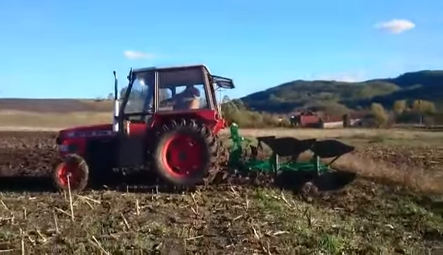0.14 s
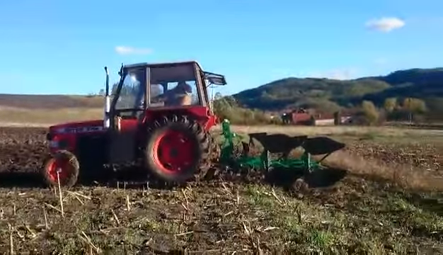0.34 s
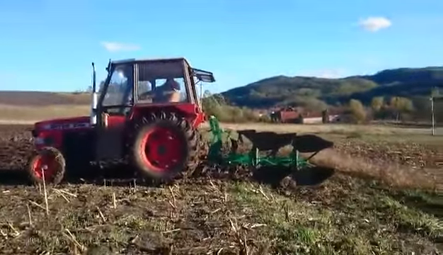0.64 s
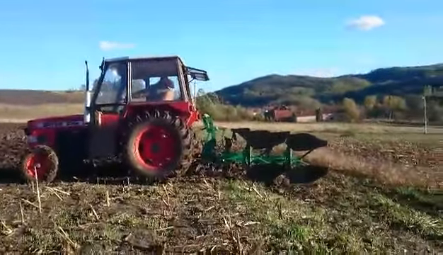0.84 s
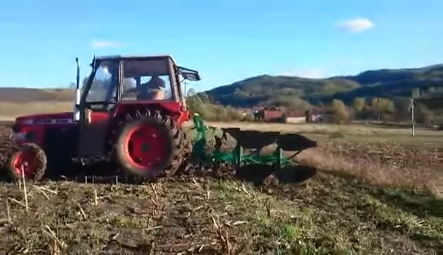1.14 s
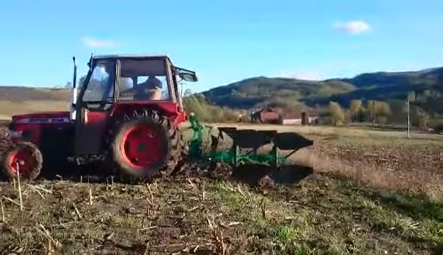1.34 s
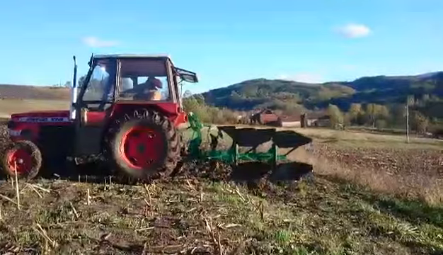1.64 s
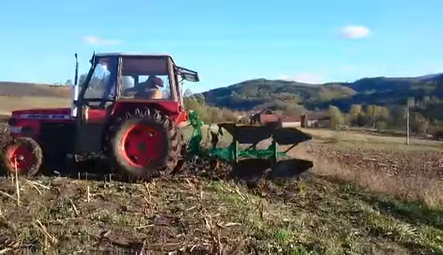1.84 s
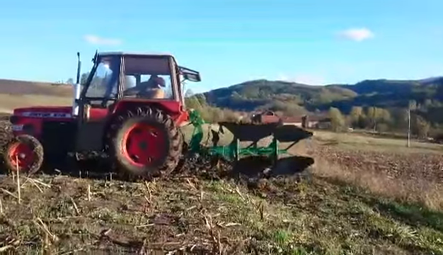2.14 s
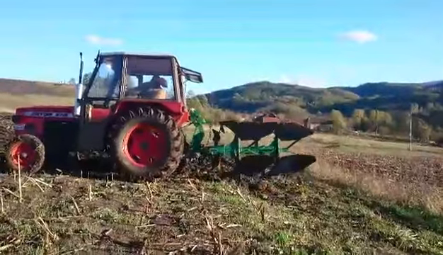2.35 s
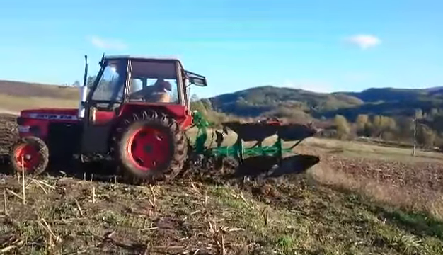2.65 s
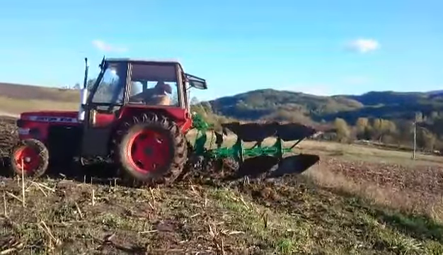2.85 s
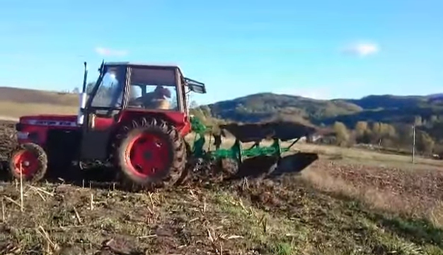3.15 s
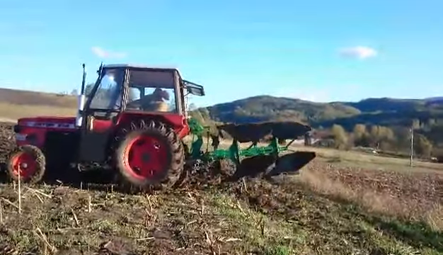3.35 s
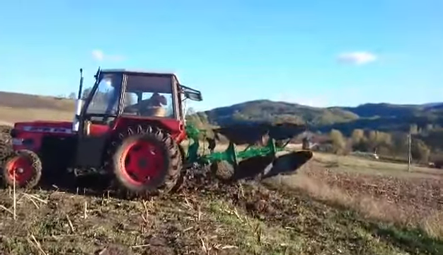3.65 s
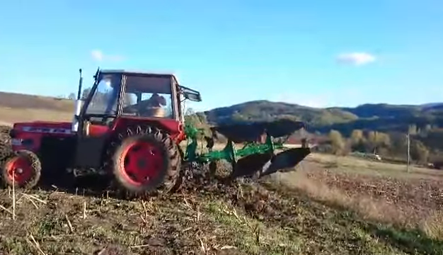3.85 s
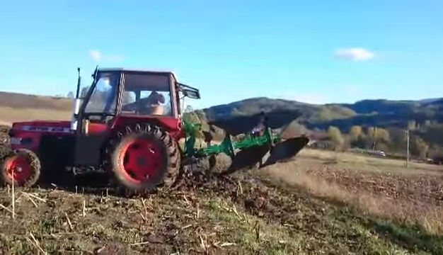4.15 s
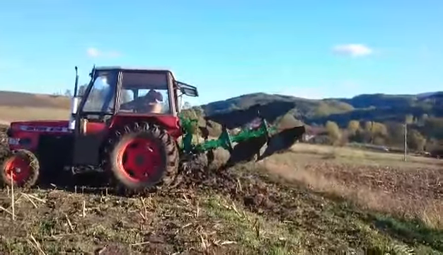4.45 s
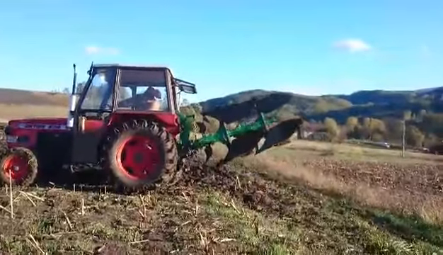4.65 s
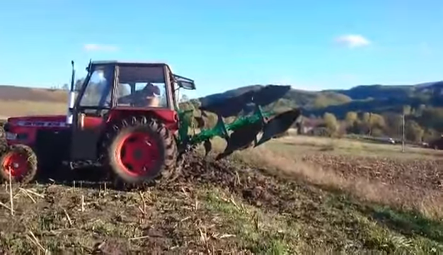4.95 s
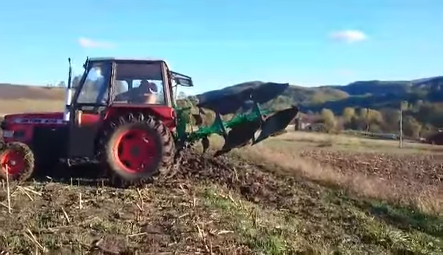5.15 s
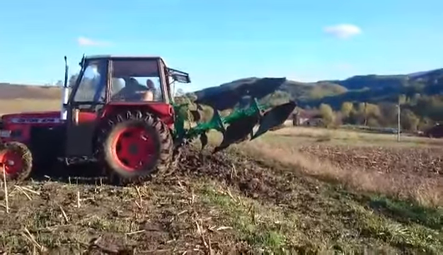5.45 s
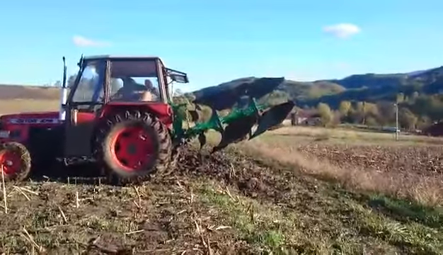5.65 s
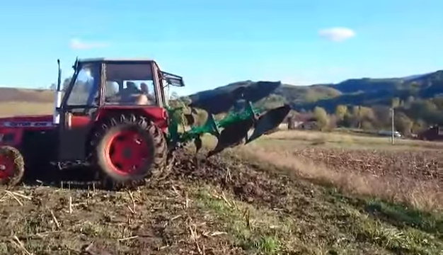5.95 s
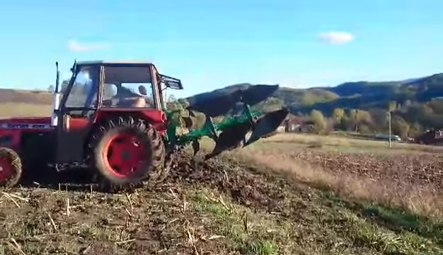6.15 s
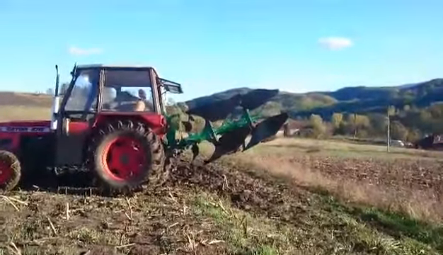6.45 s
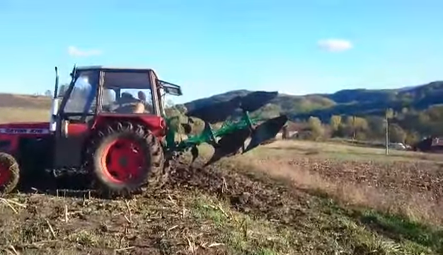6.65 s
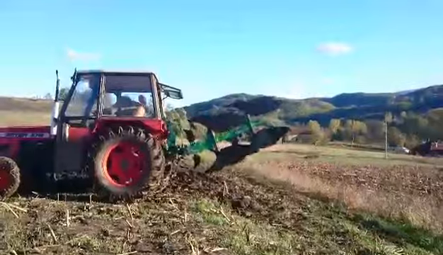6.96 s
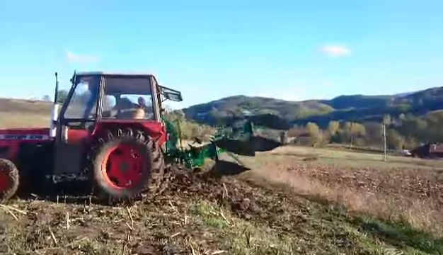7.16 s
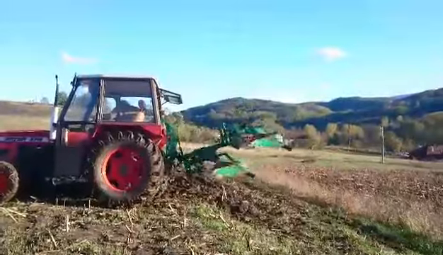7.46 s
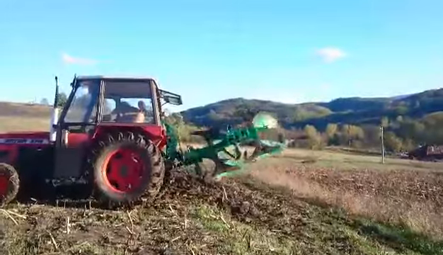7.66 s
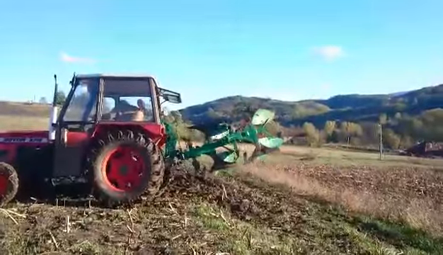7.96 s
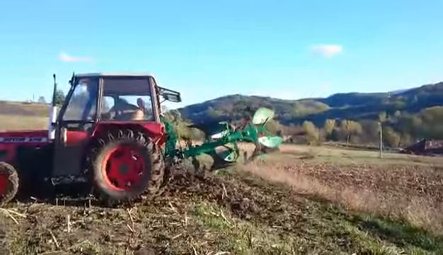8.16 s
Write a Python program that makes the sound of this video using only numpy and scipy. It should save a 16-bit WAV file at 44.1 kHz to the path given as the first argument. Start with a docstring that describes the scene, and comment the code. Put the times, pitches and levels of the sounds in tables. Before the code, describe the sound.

Steady rapid diesel knocking with a dull exhaust rumble, increasingly violent wind thumps on the microphone, and brief steel scrapes and clinks near the end.

```python
"""A diesel tractor clatters at about 38 firings a second over a dull exhaust rumble and a faint whistle.
Knocks and injector ticks are noise bursts, coloured like the block; the rumble is low noise, the whistle two tones.
Wind buffets the two ports of a small microphone, harder and harder: noise whose eddies shrink as it blows.
At the end of the furrow the plough is lifted and turned over: it clanks as scraping noise and ringing tones."""
import sys
import numpy as np
from scipy import signal
from scipy.fft import rfft, irfft
from scipy.io import wavfile
from scipy.ndimage import uniform_filter1d

SR = 44100
rng = np.random.default_rng(int(sys.argv[2]) if len(sys.argv) > 2 else 0)


def materialize(psi):
    """Save the field psi as 16-bit PCM at rate SR to the path in sys.argv[1].

    A 1-D psi becomes a single channel; in a 2-D psi each row is a channel.
    """
    bounded = np.clip(np.atleast_2d(psi).T, -1, 1)
    quanta = np.round(bounded * 32767).astype(np.int16)
    wavfile.write(sys.argv[1], SR, quanta)


N = 366471
TIME = np.arange(N) / SR
BINS = np.fft.rfftfreq(N, 1 / SR)  # Hz

# engine speed: time_s, firings_per_s
ENGINE_SPEED = [(0.0, 38.67), (0.7, 38.5), (1.5, 37.83), (2.3, 37.84), (3.1, 37.65), (4.2, 37.47),
                (4.7, 37.14), (5.1, 37.17), (5.7, 38.84), (6.5, 39.09), (7.1, 38.73), (7.6, 38.44),
                (8.31, 38.08)]


def count_firings():
    """The running count of firings: the engine speed summed over time."""
    first_firing = 0.45  # the count at the start
    return first_firing + np.cumsum(curves(ENGINE_SPEED)[0]) / SR


# the four cylinders in firing order, relative strengths: knock_db, ring_db, injector_tick_db
CYLINDERS = [(-3.5, 17, 11.5), (-5, 20.5, 11), (-3.5, 20.5, 13), (-3, 16, 15.5)]


def blows(firings, offset, cylinder_db, decay_s, scatter_db):
    """Power envelope of one decaying blow a firing, each cylinder with its own strength; mean 1."""
    number = np.arange(1, int(firings[-1]))
    late, size = rng.standard_normal((len(number), 2)).T
    jitter_s = 0.0013
    at_s = np.interp(number + offset, firings, TIME) + jitter_s * late
    place = np.clip((at_s * SR).astype(int), 0, N - 1)
    blow_db = np.take(cylinder_db, number, mode="wrap") + scatter_db * size
    train = np.zeros(N)
    train[place] = amp(blow_db) ** 2
    power = signal.lfilter([1], [1, -np.exp(-1 / (decay_s * SR))], train)
    power = abs(uniform_filter1d(power, size=280))  # softens the attacks
    return power / power.mean()


# relative engine level, with a brief dip where the wind blows hard: time_s, level_db
ENGINE_LEVEL = [(0, 3.5), (3.4, 4.5), (4.9, 2), (6.25, 5), (7.55, 4), (7.84, -1), (8.0, 6)]
# colour of the engine block at each port: freq_hz, left_db, right_db
BLOCK_COLOUR = [(408, -7, -2.5), (614, -3.5, 2), (1090, -6, 3.5), (1510, -5, 1), (1770, -5, 3),
                (2740, -12.5, -1.5), (3030, -10.5, -7.5), (4070, -9.5, -6.5), (4500, -6, -7),
                (4880, -11.5, -8), (6420, -0.5, -5.5), (8220, -9.5, -22), (9290, -4.5, -20),
                (12030, -25.5, -39), (14800, -45, -58)]


def engine(firings):
    """Injectors tick just before each combustion knock; both ring the block over the wash of gears and fan."""
    level_db = curves(ENGINE_LEVEL)[0]
    knock_db, ring_db, tick_db = np.transpose(CYLINDERS)
    # offsets count in firings
    tick = blows(firings, offset=-0.16, cylinder_db=tick_db, decay_s=0.0045, scatter_db=0.9)
    ring = blows(firings, offset=-0.13, cylinder_db=ring_db, decay_s=0.006, scatter_db=0.6)
    knock = blows(firings, offset=0, cylinder_db=knock_db, decay_s=0.005, scatter_db=0.6)

    # the treble swells and dips more than the knock does
    low = unit(ports(np.sqrt(1 + knock), likeness=0.74)) * amp(0.33 * level_db)
    middle = unit(ports(np.sqrt(1 + ring), likeness=0.63)) * amp(level_db)
    high = unit(ports(np.sqrt(amp(-3) + tick), likeness=0.68)) * amp(level_db)
    ping = unit(ports(np.sqrt(amp(-11) + tick), likeness=0.68)) * amp(level_db)

    # many close modes ripple the colour of the block
    ripple_db = unit(np.convolve(rng.standard_normal(len(BINS)), np.hanning(1000), "same"))
    body = shape(BLOCK_COLOUR, BINS) * amp(ripple_db) * np.sqrt(above(270))

    # the ticks stand out most around 6.4 kHz, where the microphone resonates
    ping_hz, ping_width_hz = 6450, 800
    pinging = np.exp(-((BINS - ping_hz) / ping_width_hz) ** 2)
    ringing, ticking = above(3180), above(4760)
    bands = [(low, 1 - ringing),
             (middle, abs(ringing - ticking)),
             (high, ticking * (1 - pinging)),
             (ping, pinging)]
    clatter = sum(colour(sound, body * np.sqrt(share)) for sound, share in bands)

    # the whole clatter flutters quickly and unevenly in level
    flutter = amp(1.1 * wander(150))
    return amp(-34.0) * unit(grainy(clatter, grain_db=1.9) * flutter)


# exhaust and chassis rumble: freq_hz, level_db
RUMBLE_COLOUR = [(35, -22), (70, 4), (110, -4), (260, -15), (520, -48.5)]


def exhaust(firings):
    """Muffled puffs blur into a low rumble that swells and lulls at random, stronger on the right."""
    knock_db = np.transpose(CYLINDERS)[0]
    puffs = blows(firings, offset=0.2, cylinder_db=knock_db, decay_s=0.009, scatter_db=2)
    swell = amp(2.4 * wander(10))
    rumble = colour(ports(np.sqrt(1 + puffs) * swell, likeness=0), shape(RUMBLE_COLOUR, BINS))
    return amp(-30.5) * sides(lean_db=-5.0) * unit(rumble)


# thin whistle over the engine: pitch_hz, peak_db
WHISTLE_TONES = [(4998, -56.5), (5192, -67)]


def whistle():
    """Two faint sine tones whose pitch wavers by about 10 Hz."""
    out = np.zeros(N)
    for pitch_hz, peak_db in WHISTLE_TONES:
        cycles = np.cumsum(pitch_hz + 10 * wander(22.8)) / SR
        out += amp(peak_db) * np.sin(2 * np.pi * cycles)
    return out


# rattles as the plough turns over: start_s, scrape_db, scrape_t60_s, ring_db, strongest_ring_hz
CLINKS = [(7.027, -20, 0.015, -36, 2885), (7.242, -26.5, 0.14, -42, 6540), (7.258, -36, 0.05, -40, 10800),
          (7.325, -33, 0.088, -30.5, 9400), (7.365, -38, 0.034, -35, 8000), (7.443, -40, 0.03, -31, 8000),
          (7.906, -19.5, 0.017, -44, 6180), (8.042, -20.5, 0.027, -31, 8810),
          (8.121, -14.5, 0.03, -29, 6180), (8.193, -19, 0.035, -50, 6750), (8.231, -25.5, 0.087, -35, 6540),
          (8.281, -38, 0.05, -29, 8000)]
# colour of the scrapes and the rustle: freq_hz, level_db
SCRAPE_COLOUR = [(500, -12), (1300, 1), (5600, -5), (6400, 5.5), (7700, -2), (10500, -8.5), (14500, -33)]
# ringing pitches heard in the clinks, some near the microphone's resonance: pitch_hz
CLINK_PITCHES = [2256, 2885, 6180, 6540, 6750, 8000, 8810, 9400, 10800]


def plough(rustle_db, ring_t60_s, reach_hz):
    """Loose steel scrapes and rings while the plough turns; soil and straw rustle off it at the end."""
    out = np.zeros((2, N))
    t = np.arange(SR // 5) / SR
    pitch_hz = np.array(CLINK_PITCHES)[:, None]
    rustle_rise = np.interp(TIME, [7.9, 8.05, 8.2], [0, 0.55, 1])
    envelope = amp(rustle_db) * rustle_rise * amp(3.4 * wander(24))
    attack_s = 0.0007
    for start_s, scrape_db, scrape_t60_s, ring_db, centre_hz in CLINKS:
        age = np.maximum(TIME - start_s, 0)
        envelope += amp(scrape_db - 60 * age / scrape_t60_s) * np.minimum(age / attack_s, 1)
        # each clink rings most at the pitches near its own
        weight = 1 / (1 + abs(pitch_hz - centre_hz) / reach_hz)
        # the phase drifts separately at each port
        drift = 0.004 * np.cumsum(rng.standard_normal((2, len(pitch_hz), len(t))), -1)
        cycles = pitch_hz * t + rng.random((len(pitch_hz), 1)) + drift
        ring = (weight * np.sin(2 * np.pi * cycles)).sum(1)
        fade = amp(ring_db - 60 * t / ring_t60_s) * np.minimum(t / attack_s, 1)
        add(out, start_s, fade * ring)

    # the scraping sings at the same pitches
    singing_width_hz, singing_db = 90, 7
    nearness = (1 / (1 + ((BINS - pitch_hz) / singing_width_hz) ** 2)).max(0)
    singing = amp(singing_db * nearness)
    scrape = colour(ports(envelope, likeness=0), unit(shape(SCRAPE_COLOUR, BINS) * singing))
    return sides(lean_db=3.6) * (out + grainy(scrape, grain_db=2.5))


# breeze between gusts, as wind strength: time_s, left_db, right_db
BREEZE = [(0, -23, -18.5), (1.1, -21, -29.5), (2.3, -26, -28), (3.2, -23.5, -55), (3.6, -26.5, -21),
          (5, -18.5, -18.5), (6.4, -22, -23.5), (7.3, -19.5, -13), (8.31, -16.5, -18)]
# gusts, as wind strength: full_strength_s (time), hold_s, strength_db, left_minus_right_db
GUSTS = [(0.052, 0.15, -21.5, -21), (0.216, 0.029, -15, 22), (0.36, 0.038, -19.5, -19),
         (0.558, 0.034, -21, 20), (0.792, 0.023, -21.5, -20), (0.87, 0.17, -23, 14),
         (1.025, 0.018, -23, -20), (1.166, 0.015, -22, -17), (1.244, 0.042, -18.5, 20),
         (1.527, 0.029, -18.5, 8), (1.915, 0.017, -21, 16), (2.11, 0.041, -26, 18), (2.477, 0.02, -25, 16),
         (2.632, 0.053, -24, 18), (2.944, 0.026, -23, 1), (3.174, 0.12, -25, 18), (3.658, 0.07, -17.5, -15),
         (4.119, 0.044, -14.5, -10), (4.194, 0.098, -21.5, -24), (4.512, 0.17, -16.5, -28),
         (4.676, 0.094, -15.5, -6.5), (4.972, 0.064, -16, -27), (5.118, 0.19, -18.5, -4),
         (5.298, 0.15, -12.5, -13.5), (5.596, 0.1, -15, -26), (5.738, 0.16, -24.5, 5),
         (5.993, 0.08, -16.5, -2), (6.228, 0.14, -20, -28), (6.493, 0.023, -18, -2), (6.66, 0.12, -23, 11),
         (6.786, 0.047, -14.5, 7.5), (6.967, 0.024, -11, -5), (7.055, 0.07, -10.5, -8),
         (7.235, 0.099, -12.5, -30), (7.377, 0.11, -14.5, -2.5), (7.627, 0.091, -10, -13.5),
         (7.77, 0.11, -10, -11), (7.966, 0.063, -12.5, -9), (8.11, 0.066, -18, -8), (8.24, 0.03, -10, -21)]


def airflow():
    """Wind strength at each port: gusts rise, hold and fall on top of a breeze that comes in puffs."""
    rise_s, fall_s = 0.014, 0.035
    puffs_db = 1.6 * np.array([wander(10), wander(10)])
    power = amp(np.array(curves(BREEZE)) + puffs_db) ** 2
    for full_s, hold_s, strength_db, lean_db in GUSTS:
        rise = 1 + (TIME - full_s) / rise_s
        fall = 1 + (full_s + hold_s - TIME) / fall_s
        gust = np.clip(np.minimum(rise, fall), 0, 1)
        power += (amp(strength_db) * sides(lean_db) * gust) ** 2
    return np.sqrt(power)


# pressure spectrum of fully developed eddies: freq_hz, level_db
EDDY_COLOUR = [(25, -15), (65, 4), (130, -3.5), (300, -11), (600, -18), (1200, -24.5), (3000, -35)]


def wind(air, gain_db, corner_hz, opening, flutter_db, calm_db, spiky):
    """Turbulence on one port: it comes in lumps, and the stronger it blows the smaller its eddies get."""
    strength = air ** 3 / (air ** 2 + amp(calm_db) ** 2)  # light air hardly stirs the port
    churn = wander(58)
    churn = unit(churn - 0.5 * uniform_filter1d(churn, size=3600))
    lumps = amp(flutter_db * 2 * np.tanh(churn / 2))
    # stronger air opens the treble
    corner = corner_hz * (strength * lumps / amp(-18)) ** opening
    corner = corner / np.hypot(1, corner / 1500)  # eddies get no smaller than the port
    noise = rfft(rng.standard_normal(N)) * shape(EDDY_COLOUR, BINS)[0]
    octave = np.log2(BINS + 1)
    out = np.zeros(N)
    # a moving low-pass, built from half-octave bands
    for centre in np.arange(4, 12.5, 0.5):
        band = irfft(noise * np.maximum(1 - 2 * abs(octave - centre), 0), N)
        out += band / np.sqrt(1 + (2 ** centre / corner) ** 6)
    out *= np.sqrt(lumps)
    # averaged over a few lumps, the pressure follows the strength of the gust
    power = uniform_filter1d(uniform_filter1d(out ** 2, size=2000), size=2000)
    push = amp(gain_db) * strength * out / np.sqrt(power + 1e-12)
    # pressure grows with the square of the air speed, which sharpens the crests
    return push + spiky * push ** 2


# single hard eddies: centre_s, strength_db, port that is struck
BUFFETS = [(0.082, -10, "right"), (0.154, -5.5, "right"), (0.493, -12.5, "left"), (0.554, -10.5, "left"),
           (1.256, -16.5, "left"), (1.666, -7, "left"), (4.992, -6, "right"), (5.381, -11, "right"),
           (5.597, -8.5, "left"), (6.008, -7.5, "right"), (6.486, -1.5, "right"), (6.67, -7, "left"),
           (6.741, -9, "left"), (6.827, 1, "left"), (6.987, -1, "left"), (7.057, 1, "right"),
           (7.088, 4, "right"), (7.307, 0.5, "right"), (7.408, -2, "right"), (7.652, -2, "right"),
           (7.826, 1.5, "right"), (7.885, -3.5, "right"), (8.119, 0.5, "right"), (8.247, 2, "right")]


def buffets(swing_db, snap_db, width_s, crest_hz):
    """A hard eddy swings the pressure at one port and snaps as its core crosses; the harder, the tighter."""
    out = np.zeros((2, N))
    t = np.arange(-SR // 40, SR // 40) / SR
    for centre_s, strength_db, port in BUFFETS:
        width = width_s * amp(2 * rng.standard_normal())
        near = 1 / (1 + (t / width) ** 2)
        # the swing is fastest near the core, with an uneven speed
        uneven = amp(2.7 * np.sin(2 * np.pi * (t / (2 * width) + rng.random())))
        turns = crest_hz * np.cumsum(near * uneven) / SR + rng.random()
        swing = np.sin(2 * np.pi * turns) * np.sqrt(near) * np.hanning(len(t))
        core_s = 0.00052 / np.sqrt(amp(strength_db))
        core_phase = np.exp(2j * np.pi * turns[len(t) // 2])
        snap = (core_phase / (1 - 1j * t / core_s) ** 3).imag
        pressure = amp(swing_db) * swing + amp(snap_db) * snap
        struck = [port == "left", port == "right"]
        add(out, centre_s + t[0], amp(strength_db) * np.outer(struck, pressure))
    return out


# lead of the left port for sound from the tractor: freq_hz, phase_radians
PORT_LEAD = [(900, 4.56), (1800, 4.845), (10000, 22.64)]


def ports(envelope, likeness):
    """Noise under an envelope, coming from the left: the right port hears it later and partly changed."""
    direct, scattered = rng.standard_normal((2, N)) * envelope
    hz, radians = np.transpose(PORT_LEAD)
    lag = BINS * np.interp(BINS, hz, radians / hz)
    delayed = colour(direct, np.exp(-1j * lag))
    same = np.clip(likeness, 0, 1)
    return np.array([direct, same * delayed + np.sqrt(1 - same ** 2) * scattered])


def grainy(x, grain_db):
    """The colour shifts at random in small patches of time and pitch."""
    z = signal.stft(x, nperseg=512, noverlap=384)[2]
    patches = uniform_filter1d(rng.standard_normal(z.shape[1:]), size=4, axis=0)
    patches = uniform_filter1d(patches, size=6, axis=1)
    return signal.istft(z * amp(grain_db * unit(patches)), nperseg=512, noverlap=384)[1][:, :N]


def amp(db):
    """Decibels to gain."""
    return 10 ** (np.asarray(db) / 20)


def unit(x):
    """Scales to rms 1."""
    return x / np.sqrt(np.mean(x ** 2) + 1e-20)


def curves(rows):
    """Each column of a time table, at every sample."""
    s, *columns = np.transpose(rows)
    return [np.interp(TIME, s, c) for c in columns]


def shape(points, hz):
    """Gain of a spectrum at hz, one row for each dB column."""
    f, *columns = np.transpose(points)
    return amp([np.interp(np.log(hz + 1), np.log(f), c) for c in columns])


def above(hz):
    """Share of the power that a steep high-pass lets through."""
    return 1 / (1 + (hz / (BINS + 1)) ** 10)


def colour(x, gain):
    """Filters by a gain for each frequency."""
    return irfft(rfft(x) * gain, N)


def wander(rate_hz):
    """Smooth random movement of rms 1."""
    return unit(colour(rng.standard_normal(N), np.exp(-(BINS / rate_hz) ** 2)))


def sides(lean_db):
    """Left and right gains of mean power 1; a positive lean favours the left."""
    return unit(amp([[lean_db / 2], [-lean_db / 2]]))


def add(mix, s, sound):
    """Mixes a stereo sound in at time s."""
    part = mix[:, max(round(s * SR), 0):][:, :sound.shape[1]]
    part += sound[:, :part.shape[1]]


def gain_control(x, threshold_db, share, recovery_db_per_s):
    """Turns both ports down when their mean level passes the threshold, and comes back slowly."""
    power = abs(uniform_filter1d((x ** 2).mean(0), size=900))
    level_db = 10 * np.log10(power + 1e-12)
    # the held peak level falls at a steady rate
    fall_db = TIME * recovery_db_per_s
    held_db = np.maximum.accumulate(level_db + fall_db) - fall_db
    over_db = np.maximum(held_db - threshold_db, 0)
    return x * amp(-share * uniform_filter1d(over_db, size=400))


def scene():
    """Tractor and plough, with separate wind on each port."""
    firings = count_firings()
    tractor = engine(firings) + whistle() + exhaust(firings)
    rattle = plough(rustle_db=-41.5, ring_t60_s=0.14, reach_hz=220)
    left, right = airflow()
    gusts = np.array([
        wind(left, gain_db=4.0, corner_hz=278, opening=0.81, flutter_db=5.2, calm_db=-22.0, spiky=0.41),
        wind(right, gain_db=2.0, corner_hz=405, opening=0.85, flutter_db=5.2, calm_db=-21.0, spiky=0.59)])
    gusts += buffets(swing_db=-3.5, snap_db=-1.5, width_s=0.00351, crest_hz=340.5)
    return tractor + rattle + gusts


def record(dry):
    """The microphone sheds the deepest bass; the recorder ducks and softly overloads on loud gusts, and limits
    the treble."""
    thin = signal.sosfilt(signal.butter(6, 38, "highpass", fs=SR, output="sos"), dry)
    ducked = gain_control(thin, threshold_db=-11.5, share=0.39, recovery_db_per_s=29)
    ceiling = 0.87  # of full scale
    held = ducked / (1 + (ducked / ceiling) ** 4) ** (1 / 4)
    band_limit = signal.firwin(511, 15000, window=("kaiser", 9), fs=SR)  # low-pass at 15 kHz
    return signal.oaconvolve(held, band_limit[None], "same")


dry = scene()
out = record(dry)
materialize(out)
```